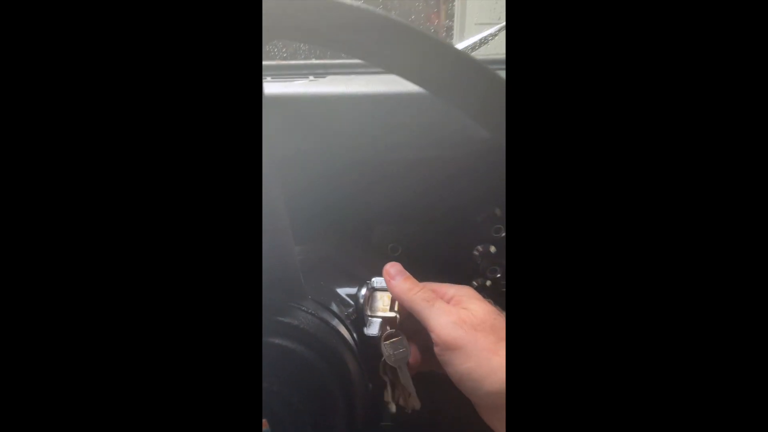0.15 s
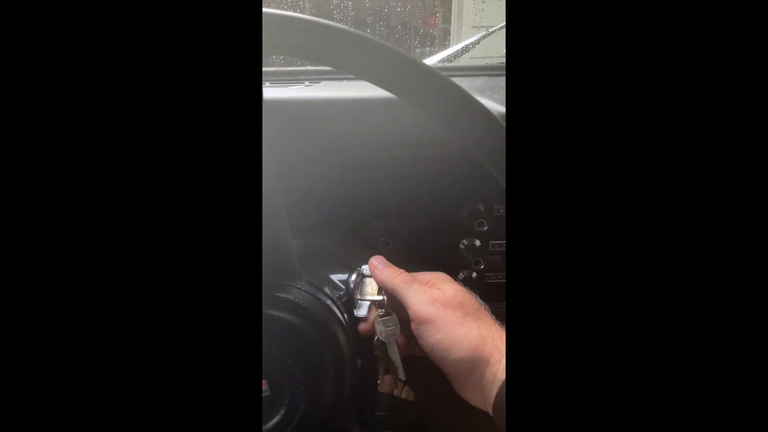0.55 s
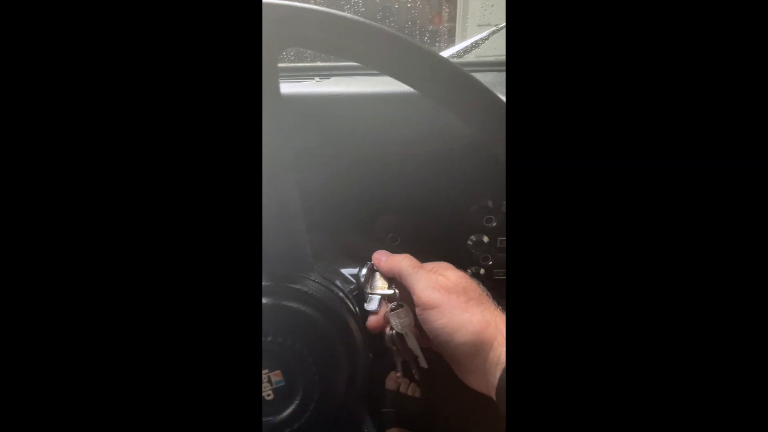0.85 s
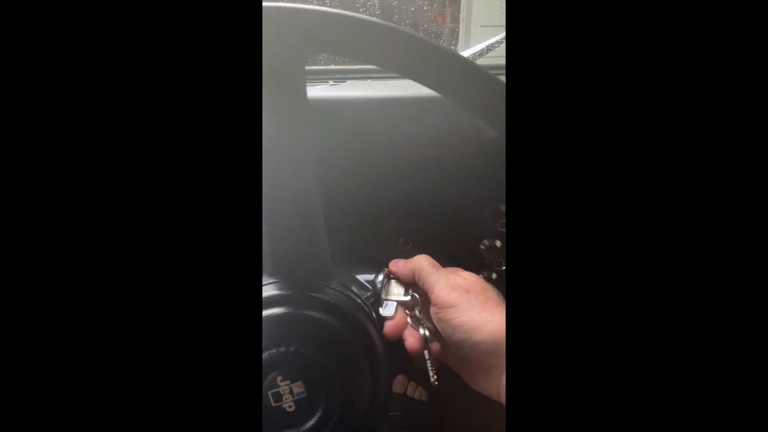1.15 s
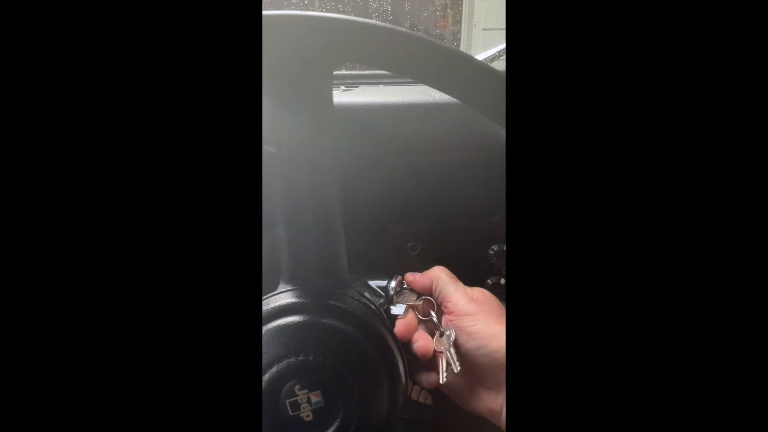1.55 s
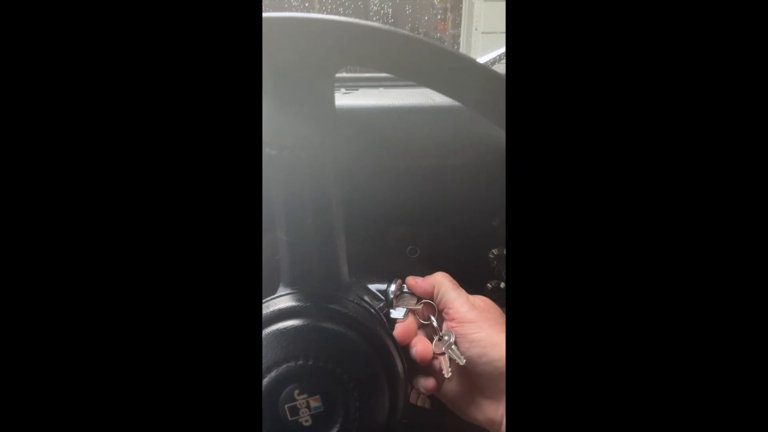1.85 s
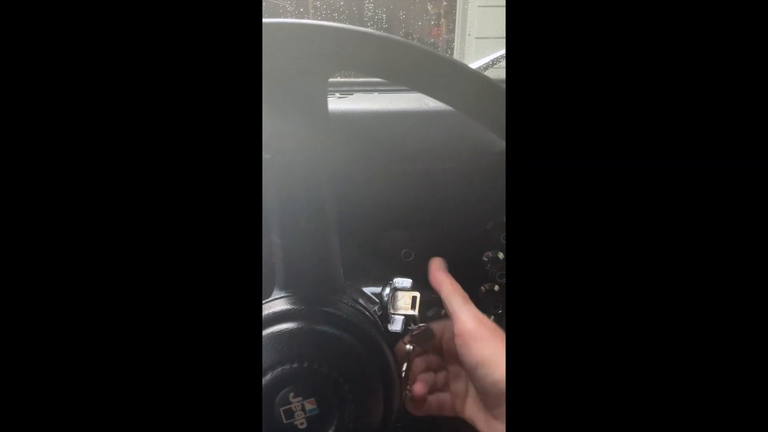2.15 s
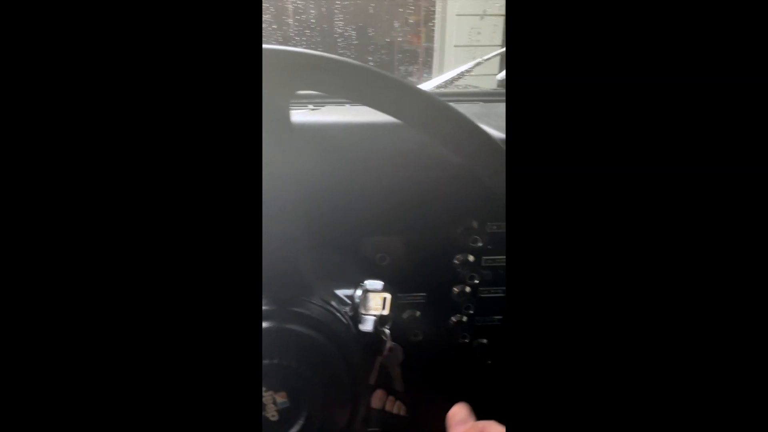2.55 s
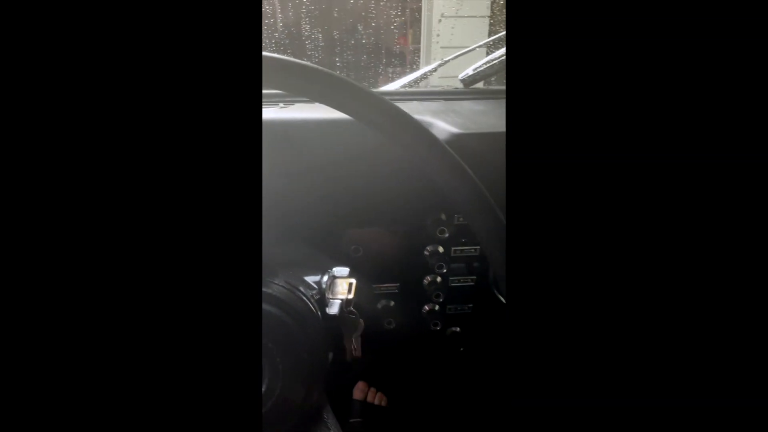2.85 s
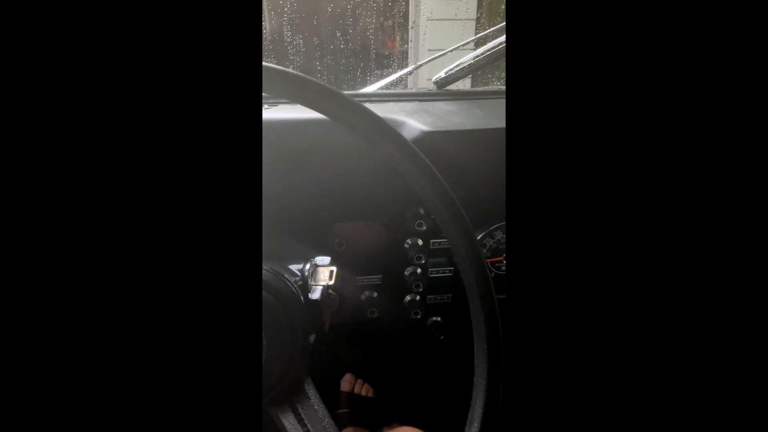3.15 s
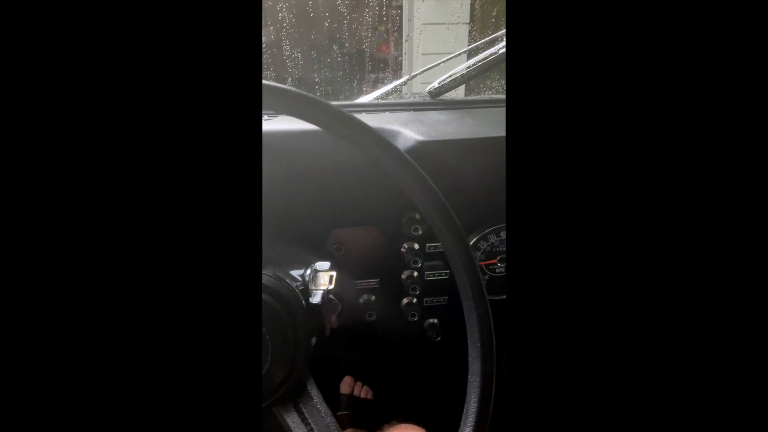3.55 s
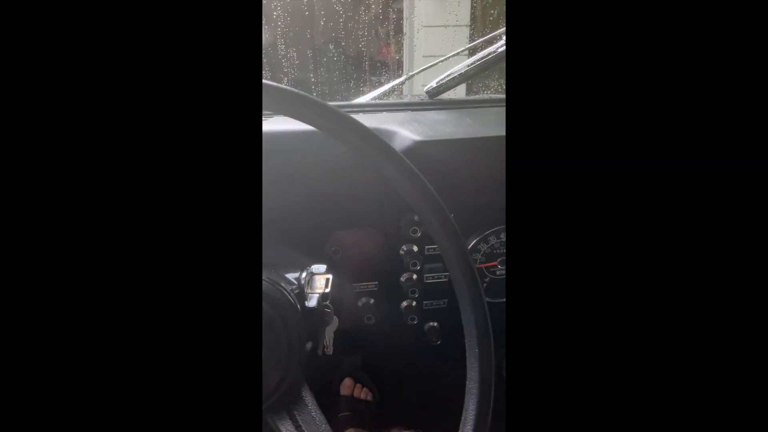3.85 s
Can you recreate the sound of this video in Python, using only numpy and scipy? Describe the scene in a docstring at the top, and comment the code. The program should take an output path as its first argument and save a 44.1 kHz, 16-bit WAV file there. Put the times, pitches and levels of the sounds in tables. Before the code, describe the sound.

Engine start heard inside a car, keys clinking, starter grinding briefly, motor revving up and dropping

```python
"""Starting a car engine, heard from the cabin

A hand turns the key in a parked car: knocks mix noise bursts with dying modes, and more such modes jingle the keys.
The starter slams in, grinds as random gear-tooth clicks ring its housing, and kicks out. The engine catches, revs up
and drops to idle: sines at multiples of the crank rate boom, noise bands rumble and clatter, a faint tone whines."""
import sys
import numpy as np
from scipy import signal
from scipy.fft import rfft, irfft
from scipy.io import wavfile
from scipy.ndimage import uniform_filter1d, map_coordinates

SR = 44100
rng = np.random.default_rng(int(sys.argv[2]) if len(sys.argv) > 2 else 0)


def boost_factor(decibels):
    """Convert a level in decibels to a linear amplitude factor."""
    exponent = np.asarray(decibels, float) / 20
    return 10 ** exponent


def dump(signal):
    """Clip the signal to [-1, 1] and save it as 16-bit WAV at the path in sys.argv[1]."""
    limited = np.clip(np.atleast_2d(signal).T, -1, 1)
    pcm = np.round(limited * 32767).astype(np.int16)
    wavfile.write(sys.argv[1], SR, pcm)


N = 176400
T = np.arange(N) / SR

# quiet cabin background, relative spectrum: f/Hz, level/dB
AIR_SPECTRUM = [(15, -69), (25, -27), (76, -4), (169, -8), (265, -20.5), (303, -20.5), (346, -16),
                (416, -24), (1270, -39), (1370, -44), (3670, -51), (14200, -57.5)]

# knocks of lock and dashboard: t/s, level/dB, noise decay t60/s, favoured f/Hz
KNOCKS = [(0.0, -35.5, 0.13, 3000), (0.53, -66, 0.087, 2750), (0.899, -64, 0.074, 1400),
          (0.98, -63, .1, 2550), (1.39, -77, 0.09, 2700), (1.412, -62, 0.054, 2700),
          (3.04, -32, 0.047, 1143)]
# dry noise of a knock, relative spectrum: f/Hz, level/dB
KNOCK_SPECTRUM = [(180, -48), (300, -20), (711, -1.5), (839, -6), (1210, 0.5), (1950, -2.5), (2270, -7),
                  (3300, -8), (15800, -24)]
# modes rung by the knocks: f/Hz, relative level/dB, t60/s
KNOCK_MODES = [(1034, -6, .1), (1240, -4, .08), (1400, -6, .06), (1965, -5, .06), (2550, -4, .08),
               (2750, -5, .1), (3100, 1, .13)]
# scrape of the key in the lock: t/s, level/dB
SCRAPE = [(0.05, -69), (0.094, -72), (0.51, -85.5), (0.528, -77.5), (0.766, -83), (0.98, -78), (1.138, -87),
          (1.174, -73), (1.314, -67.5), (1.368, -77), (1.402, -62), (1.53, -78.5)]
# its relative spectrum: f/Hz, level/dB
SCRAPE_SPECTRUM = [(400, -31), (600, -7), (1200, -9.5), (2600, -13), (6000, -18.5), (11000, -20),
                   (14500, -59)]

# modes of the keys: f/Hz, relative level/dB, undamped t60/s
KEY_MODES = [(6440, -6, .14), (7490, -8, .3), (7960, -14, .2), (8950, -2, .12), (9150, -7, .09),
             (9710, -12, .3), (10820, -5, .06), (10940, -10, .2), (11440, -8, .25), (12200, -12, .3),
             (13370, -8, .2), (13510, -8, .18), (15110, -8, .08), (15260, -2, .16), (15450, -4, .14)]
# key clinks: t/s, level/dB, favoured f/Hz
CLINKS = [(0.0, -50, 9000), (0.165, -74, 12200), (0.858, -69, 15400), (0.861, -70, 9100),
          (1.033, -72, 11440), (1.04, -73, 6440), (1.23, -72, 6440), (1.252, -64, 9100),
          (1.256, -56, 13300), (1.282, -41, 14300), (1.283, -45.5, 9500), (1.387, -62, 15300),
          (1.575, -40, 15000), (2.16, -50, 15300), (2.246, -45, 9000), (2.262, -47, 15300),
          (2.255, -49, 13520), (2.268, -49, 12200), (2.285, -43, 15300), (2.386, -35, 15300),
          (2.387, -39.5, 8800), (2.388, -39.5, 10870), (2.387, -40.5, 6800), (2.402, -46, 15290),
          (2.41, -47, 13500), (2.412, -59, 6900), (2.435, -50, 10900)]

# starter levels: t/s, gear grind level/dB, treble level/dB, body thud level/dB
STARTER = [(1.535, -81, -79, -60), (1.545, -61, -55, -49), (1.567, -30.5, -37, -35),
           (1.579, -26.5, -27, -35), (1.591, -25.5, -31.5, -42), (1.633, -41, -45.5, -31),
           (1.691, -40.5, -50.5, -37.5), (1.713, -45, -47.5, -40), (1.731, -40, -41.5, -42),
           (1.767, -43, -47, -40), (1.799, -38, -41, -39), (1.869, -35, -39, -32), (1.923, -39, -40, -34),
           (2.041, -36.5, -39.5, -38), (2.089, -33, -35, -30), (2.101, -27.5, -27.5, -27.5),
           (2.127, -34, -39.5, -29), (2.167, -34, -41, -34.5), (2.205, -42, -50, -39.5),
           (2.24, -43, -72, -41)]
# gear grind, relative spectrum before the housing and mesh are added: f/Hz, level/dB
GRIND_SPECTRUM = [(240, -26), (400, -11.5), (578, -10), (803, -5), (939, -5), (1250, -1.5), (1480, -4),
                  (2600, -11.5), (3380, -58)]
# starter treble, relative spectrum: f/Hz, level/dB
SIZZLE_SPECTRUM = [(1350, -27), (2300, 0.5), (2660, 0), (2930, -1), (4910, -3.5), (7770, -10), (8770, -9),
                   (15200, -19), (15800, -38)]
# body thud, relative spectrum: f/Hz, level/dB
THUD_SPECTRUM = [(18, -53), (30, -38), (66, 3.5), (124, -2.5), (199, -1), (223, -11), (337, -9.5),
                 (428, -20.5), (600, -22), (780, -26)]
# resonances of the starter housing: f/Hz, width/Hz, relative level/dB
HOUSING = [(736, 22, -7.5), (1212, 49, -9.5), (1774, 27, -3), (1947, 59, -2.5), (2240, 78, -22),
           (2600, 60, -10), (3330, 46, -10.5), (3850, 61, -13)]
# centre of the gear mesh band: t/s, f/Hz
MESH = [(1.6, 1460), (1.66, 1530), (1.76, 1780), (1.86, 2320), (1.92, 2600), (2.06, 2860)]
# pinion blows: t/s, level/dB
SLAMS = [(1.581, -19), (1.6, -19.5), (2.096, -22)]
# modes of the car body: f/Hz, relative level/dB, t60/s
BODY_MODES = [(127.3, 4.5, 0.33), (190, -12, 0.13), (341, -1, 0.13), (505, -9, 0.087), (1260, -13, 0.095),
              (1308, 5, 0.073), (1795, 4, 0.13)]

# engine speed and firing boom: t/s, crank rate f/Hz, level/dB
ENGINE = [(1.86, 23.08, -51), (1.94, 27.15, -28), (1.99, 30.5, -29), (2.01, 31.47, -26), (2.1, 35.18, -36),
          (2.16, 36.43, -44), (2.19, 36.68, -32), (2.36, 38.64, -36), (2.59, 40.86, -35.5),
          (2.63, 40.96, -33), (3.19, 37.66, -38), (3.24, 35.72, -48), (3.29, 32.37, -32),
          (3.36, 28.5, -36.5), (3.63, 26.94, -40), (3.95, 24.24, -44), (4.0, 23.87, -57)]
# third crank order, loud where it meets the cabin's boom: t/s, level/dB
DRONE = [(1.86, -36), (2.17, -53), (2.25, -31), (2.42, -33.5), (2.52, -41), (2.64, -47), (2.72, -45),
         (3.0, -32), (3.2, -29.5), (3.26, -28.5), (3.3, -65), (4, -43)]
# other crank orders before the cabin colours them: multiple of the crank rate, relative level/dB
ORDERS = [(2.5, -11.5), (3.5, -14), (4, -2), (5, -8), (5.5, -7), (6, -11), (8, -12.5), (9, -13)]
# cabin resonances: f/Hz, width/Hz, relative level/dB
CABIN = [(112, 3, -1.5), (166.2, 7.2, -7.5), (214.6, 10, -4.5), (332.8, 14.6, -7)]
# running noise: t/s, clatter level/dB, rumble level/dB
RUNNING = [(2.2, -42, -37.5), (2.424, -43, -42), (3.378, -46.5, -44), (3.662, -50.5, -49.5),
           (3.92, -49.5, -48), (3.95, -49, -43)]
# clatter, relative spectrum: f/Hz, level/dB
CLATTER_SPECTRUM = [(210, -36), (350, 1.5), (431, -7), (521, -4), (896, -6), (1020, -3.5), (2190, -8),
                    (2700, -11), (3110, -16.5), (3560, -11.5), (4300, -16), (8620, -22), (15800, -34)]
# rumble, relative spectrum: f/Hz, level/dB
RUMBLE_SPECTRUM = [(15, -46), (30, -16), (65, -11), (108, -5.5), (181, -9.5), (271, -17.5), (321, -17),
                   (576, -41), (700, -42)]
# belt-side whine: t/s, mean f/Hz, level/dB
WHINE = [(2.2, 2000, -55), (2.3, 2170, -55), (2.42, 2260, -56), (2.7, 2270, -56), (2.965, 2190, -61),
         (2.985, 2150, -47.5), (3.19, 2130, -49), (3.23, 2070, -50), (3.3, 1820, -49), (3.34, 1640, -46),
         (3.43, 1590, -50), (3.6, 1530, -52), (3.755, 1430, -55), (3.78, 1340, -52), (4, 1290, -52)]

AIR_DB = -57
FAVOUR_DB_PER_OCTAVE = 58  # how fast modes weaken away from a blow's favoured pitch
CLINK_SPREAD_DB, HAND_DAMPING, FLUTTER = 3, 0.5, 0.8
TICK_DB, TICK_T60_S = -14, 0.05
RATTLE_WOBBLE_DB = 4.5
MESH_WIDTH_HZ, MESH_SHARE, MESH_END_S = 70, 0.3, 2.08
CATCH_S = 1.833
ORDER_DB, ORDER_WOBBLE_DB, DIRECT_DB = -36, 2, -9
WHINE_WIDTH_HZ, WHINE_FUZZ, WHINE_WAVER_HZ, WHINE_THROB_DB = 100, 0.6, 12, 2.8
MIC_LOW_HZ, EDGE_HZ = 41, 15850


def evened(x):
    """Normalisation: scales x to rms 1."""
    return x / np.sqrt(np.mean(x ** 2) + 1e-20)


def curve(rows, col=1, off_db=None):
    """Linear interpolation of one column of a time table; off_db holds outside its span."""
    rows = np.array(rows, float)
    return np.interp(T, rows[:, 0], rows[:, col], off_db, off_db)


def slow(rate_hz):
    """Band-limited random drift: cubic interpolation of sparse random points, rms 1."""
    size = int(N / SR * rate_hz * 2) + 4
    points = rng.standard_normal(size)
    return evened(map_coordinates(points, [np.linspace(0, size - 1, N)], order=3))


def colour(x, spectrum):
    """Linear filtering: weights the spectrum of x, then sets rms 1."""
    f, db = np.transpose(spectrum)
    hz = np.fft.rfftfreq(len(x), 1 / SR)
    gain_db = np.interp(np.log(hz + 1), np.log(f + 1), db, -100, -100)
    return evened(irfft(rfft(x) * boost_factor(gain_db), len(x)))


def grains(per_s, spread_db, noise):
    """Shot noise: sparse random clicks of uneven size over a share of smooth noise."""
    size = boost_factor(spread_db * np.minimum(rng.exponential(1, N), 4)) * rng.choice([-1, 1], N)
    clicks = size * (rng.random(N) < per_s / SR)
    return evened(clicks) + noise * rng.standard_normal(N)


def patchy(x, spread_db):
    """Random modulation: louder and softer patches over time and pitch."""
    z = signal.stft(x, nperseg=512)[2]
    across_pitch = uniform_filter1d(rng.standard_normal(z.shape), size=3, axis=0)
    field = evened(uniform_filter1d(across_pitch, size=6, axis=1))
    return evened(signal.istft(z * boost_factor(spread_db * field), nperseg=512)[1][:N])


def resonate(x, hz, width):
    """Resonance of gain 1 that follows hz: shift down to zero, low-pass, shift back."""
    carrier = np.exp(2j * np.pi * np.cumsum(hz * np.ones(len(x))) / SR)
    r = np.exp(-np.pi * width / SR)
    return 2 * (carrier * signal.lfilter([1 - r], [1, -r], x / carrier)).real


def rung(modes, t, d):
    """Modal superposition: exponentially dying sines with random phases from d, peak 1."""
    f, db, t60 = np.transpose(modes)[:, :, None]
    phase = 3 * d[:len(modes), None]
    ring = (boost_factor(db - 60 * t / t60) * np.sin(2 * np.pi * f * t + phase)).sum(0)
    return ring / abs(ring).max()


def add(mix, s, sound):
    """Superposition: adds sound to mix in place from time s."""
    part = mix[round(max(s, 0) * SR):][:len(sound)]
    part += sound[:len(part)]


def air():
    """Filtered noise: the low background of the quiet cabin, its level drifting at random."""
    return boost_factor(AIR_DB + 2.0 * slow(5.3)) * colour(rng.standard_normal(N), AIR_SPECTRUM)


def cabin_echo(x):
    """Reverberation by convolution: a short sparse decaying tail of the small upholstered cabin."""
    t = np.arange(SR // 10) / SR
    taps = rng.choice([-1, 1], len(t)) * (rng.random(len(t)) < 0.05) * boost_factor(-60 * t / 0.059)
    return signal.oaconvolve(x, taps / np.linalg.norm(taps))[:N]


def knocks_and_scrape():
    """Impact and friction: knocks of lock and dashboard mix noise with dying modes; the turning key scrapes."""
    out, t = np.zeros(N), np.arange(SR // 5) / SR
    draws = rng.standard_normal((len(KNOCKS), len(t)))
    for (s, peak_db, t60, hz), d in zip(KNOCKS, draws):
        modes = [(f, db - FAVOUR_DB_PER_OCTAVE * abs(np.log2(f / hz)), ring_s)
                 for f, db, ring_s in KNOCK_MODES]
        burst = boost_factor(-60 * t / t60) * colour(d, KNOCK_SPECTRUM)
        add(out, s, boost_factor(peak_db) * (0.4 * burst + 0.44 * rung(modes, t, d)))
    scrape = colour(grains(1500, 4.2, 1.2), SCRAPE_SPECTRUM)
    return out + boost_factor(curve(SCRAPE, off_db=-120)) * scrape


def keys():
    """Modal ringing near a favoured pitch, with a tick: the hand damps early clinks, flutter roughens all."""
    out, t = np.zeros(N), np.arange(SR // 4) / SR
    draws = rng.standard_normal((len(CLINKS), len(KEY_MODES) * 2 + len(t)))
    for (s, peak_db, hz), d in zip(CLINKS, draws):
        damping = HAND_DAMPING if s < CATCH_S else 1
        modes = [(f, db + CLINK_SPREAD_DB * e - FAVOUR_DB_PER_OCTAVE * abs(np.log2(f / hz)), t60 * damping)
                 for (f, db, t60), e in zip(KEY_MODES, d[len(KEY_MODES):])]
        noise = d[-len(t):]
        tick = np.diff(noise, prepend=0) * boost_factor(TICK_DB - 60 * t / TICK_T60_S)
        flutter = 1 + FLUTTER * evened(uniform_filter1d(noise, size=120))
        add(out, s, boost_factor(peak_db) * (rung(modes, t, d) * flutter + tick))
    return out


def starter():
    """Forced resonance: gear teeth excite housing and rising mesh band; pinion blows ring the body."""
    teeth = grains(2500, 3.1, 1.57)
    housing = sum(boost_factor(db + RATTLE_WOBBLE_DB * slow(18)) * evened(resonate(teeth, f, w))
                  for f, w, db in HOUSING)
    mesh = evened(resonate(teeth, curve(MESH), MESH_WIDTH_HZ))
    mesh = boost_factor(RATTLE_WOBBLE_DB * slow(16)) * np.clip((MESH_END_S - T) / 0.03, 0, 1) * mesh
    grind = patchy(colour(teeth, GRIND_SPECTRUM), spread_db=2.5) + 0.5 * evened(housing)
    grind = evened(grind) + MESH_SHARE * mesh
    sizzle = patchy(colour(grains(3700, 1.8, 2.6), SIZZLE_SPECTRUM), spread_db=2.0)
    thud = colour(rng.standard_normal(N), THUD_SPECTRUM)
    out = np.zeros(N)
    for col, part in enumerate([grind, sizzle, thud], 1):
        out += uniform_filter1d(boost_factor(curve(STARTER, col=col, off_db=-120)), 130) * part

    t = np.arange(SR // 3) / SR
    rise = np.minimum(t / 0.00099, 1)
    draws = rng.standard_normal((len(SLAMS), len(BODY_MODES)))
    for (s, db), d in zip(SLAMS, draws):
        add(out, s, boost_factor(db) * rise * rung(BODY_MODES, t, d))
    return out


def engine_orders(turn, on):
    """Harmonic excitation: firing boom, third order, and further crank orders ringing the cabin."""
    firing = boost_factor(curve(ENGINE, col=2)) * np.sin(2 * turn)  # two firings a turn
    boom = np.sqrt(2) * (firing + boost_factor(curve(DRONE)) * np.sin(3 * turn))
    orders = on * sum(boost_factor(db + ORDER_WOBBLE_DB * slow(11)) * np.sin(k * turn + 2 * np.pi * rng.random())
                      for k, db in ORDERS)
    cabin = sum(boost_factor(db) * resonate(orders, f, w) for f, w, db in CABIN)
    return on * boom + boost_factor(ORDER_DB) * (boost_factor(DIRECT_DB) * orders + cabin)


def running_noise(turn):
    """Filtered noise: drifting rumble, and patchy clatter modulated slightly at the firing rate."""
    beat = 1 + 0.043 * np.cos(2 * turn)
    clatter = patchy(colour(grains(2500, 1.1, 2.5), CLATTER_SPECTRUM), spread_db=2.0)
    clatter = boost_factor(curve(RUNNING) + 0.71 * slow(10)) * beat * clatter
    rumble = colour(rng.standard_normal(N), RUMBLE_SPECTRUM)
    return clatter + boost_factor(curve(RUNNING, col=2) + 0.84 * slow(8.7)) * rumble


def belt_whine():
    """Frequency modulation: a wavering sine, blurred by narrow-band noise at the same pitch."""
    hz = curve(WHINE) + WHINE_WAVER_HZ * slow(25)
    fuzz = evened(resonate(rng.standard_normal(N), hz, WHINE_WIDTH_HZ))
    whine = np.sin(2 * np.pi * np.cumsum(hz) / SR) + WHINE_FUZZ * fuzz
    return boost_factor(curve(WHINE, col=2) + WHINE_THROB_DB * slow(32)) * evened(whine)


def engine():
    """Superposition on one crank phase: orders from the catch on, then running noise and whine."""
    turn = 2 * np.pi * np.cumsum(curve(ENGINE)) / SR
    on = np.clip((T - CATCH_S) / 0.05, 0, 1)
    fade = np.clip((T - 2.17) / 0.062, 0, 1)
    return engine_orders(turn, on) + fade * (running_noise(turn) + belt_whine())


def scene():
    """Linear superposition of all sources; only the near sounds (keys, knocks, scrape) get the echo."""
    near = keys() + knocks_and_scrape()
    return (near + boost_factor(-8.0) * cabin_echo(near) + engine() + starter() + air())[None]


def roll_off(x):
    """The treble ends steeply here."""
    return signal.sosfilt(signal.butter(12, 16650, fs=SR, output="sos"), x)


def record(dry):
    """Band-limiting: the bass roll-off and upper band edge of a phone."""
    high_pass = signal.butter(2, MIC_LOW_HZ, "high", fs=SR, output="sos")
    thin = signal.sosfilt(high_pass, dry)
    low_pass = signal.firwin(511, EDGE_HZ, window=("kaiser", 9), fs=SR)
    mix = signal.oaconvolve(thin, low_pass[None], "same")
    return roll_off(mix)


dry = scene()
out = record(dry)
dump(out)
```